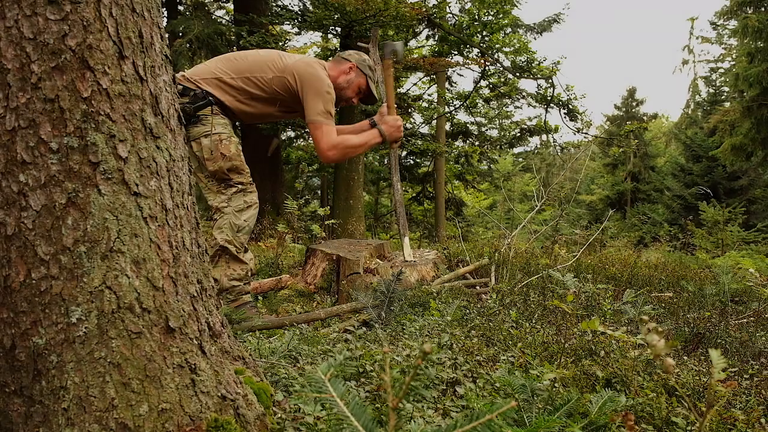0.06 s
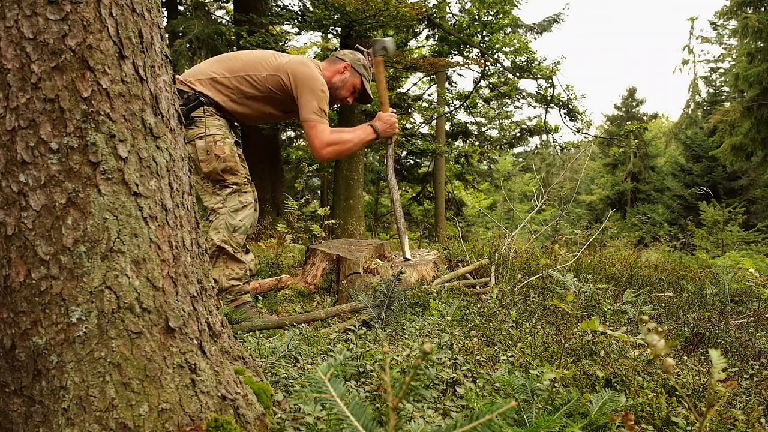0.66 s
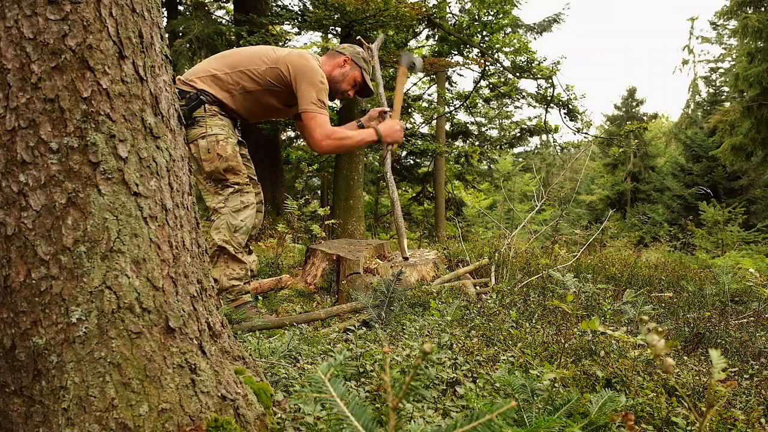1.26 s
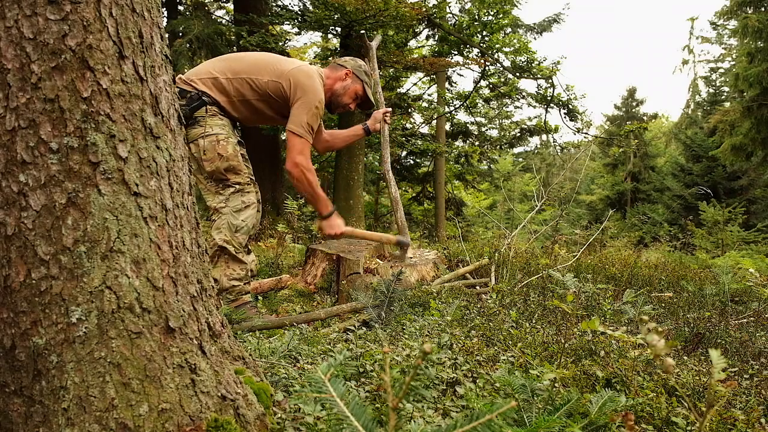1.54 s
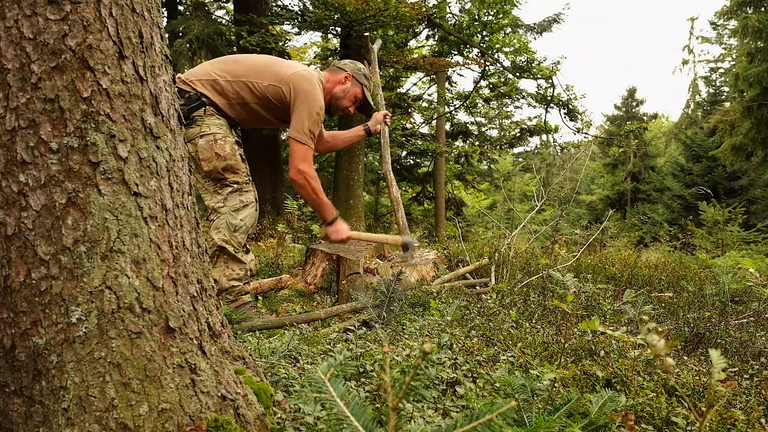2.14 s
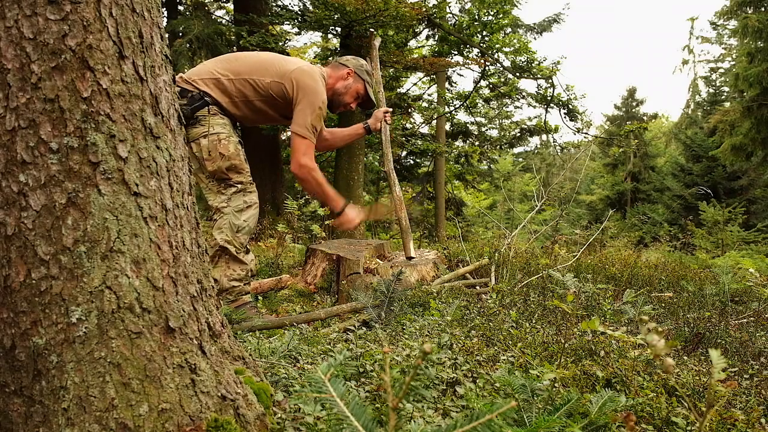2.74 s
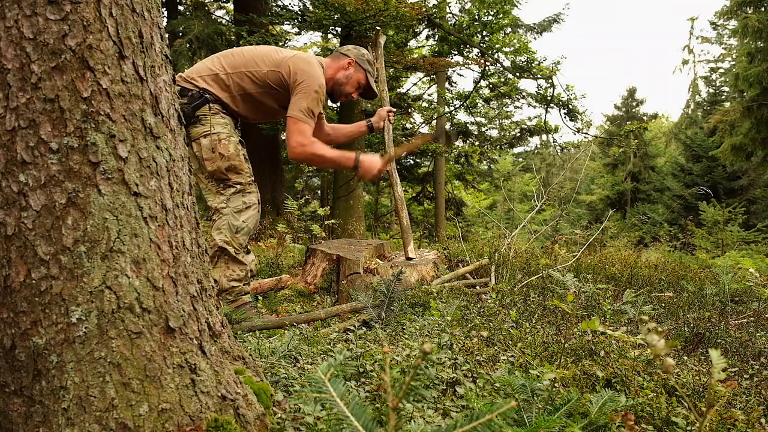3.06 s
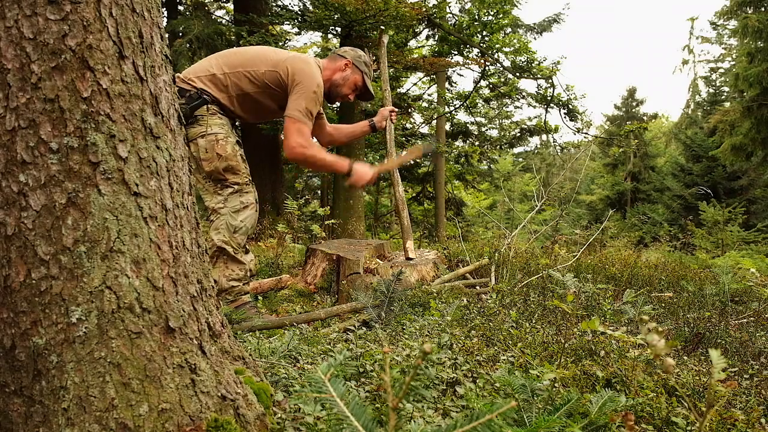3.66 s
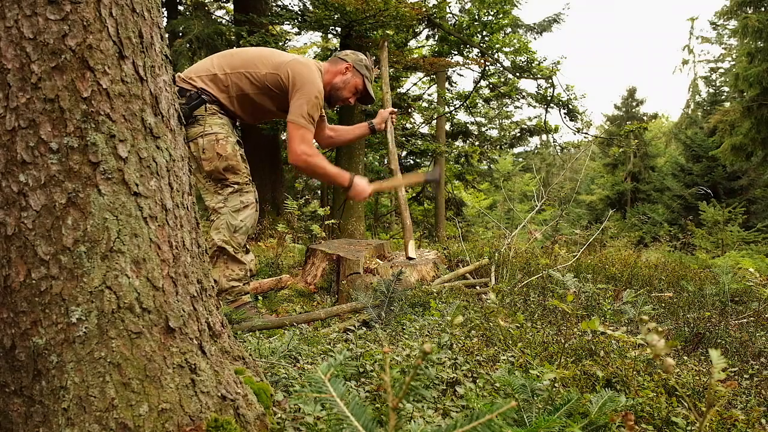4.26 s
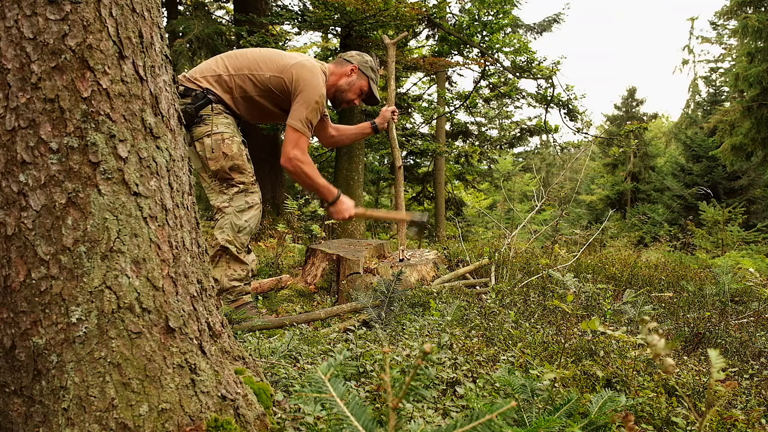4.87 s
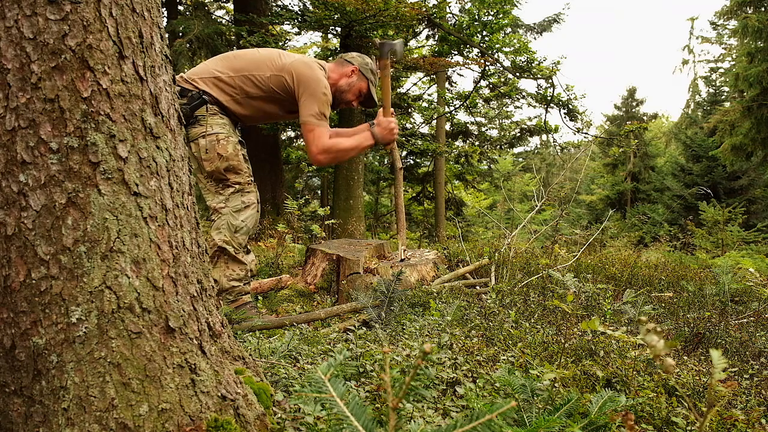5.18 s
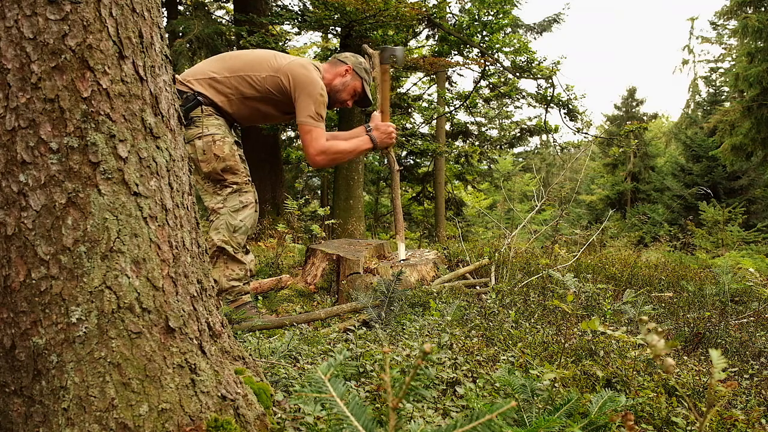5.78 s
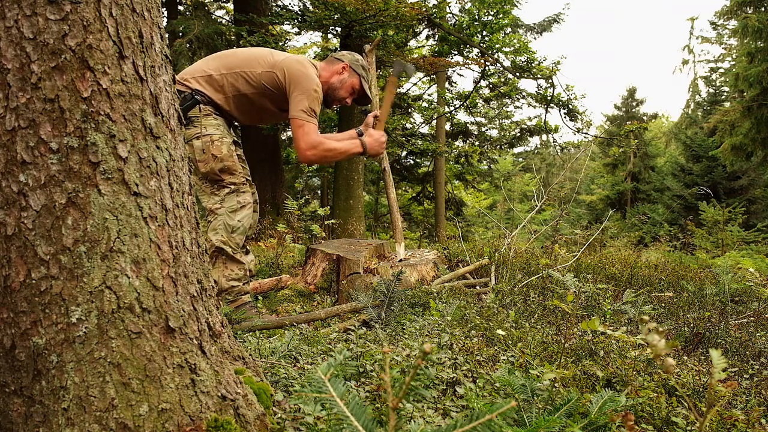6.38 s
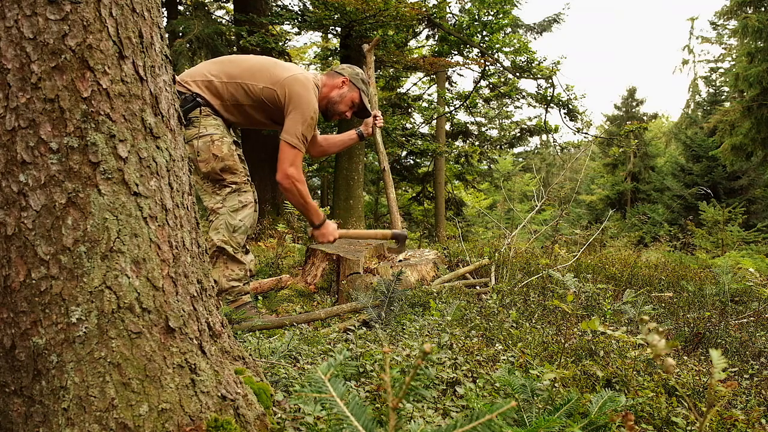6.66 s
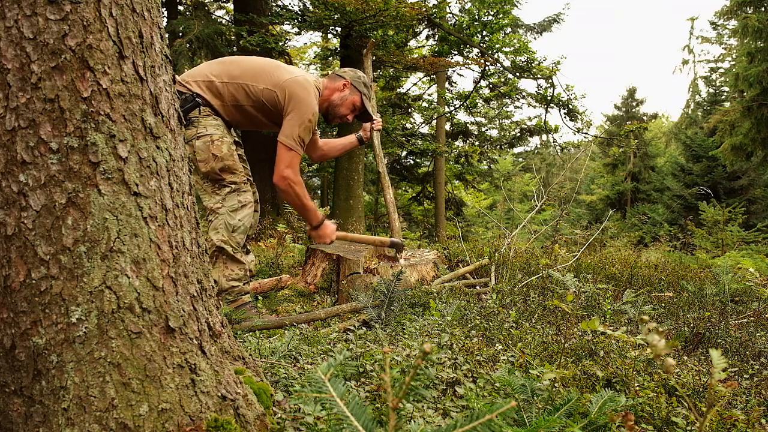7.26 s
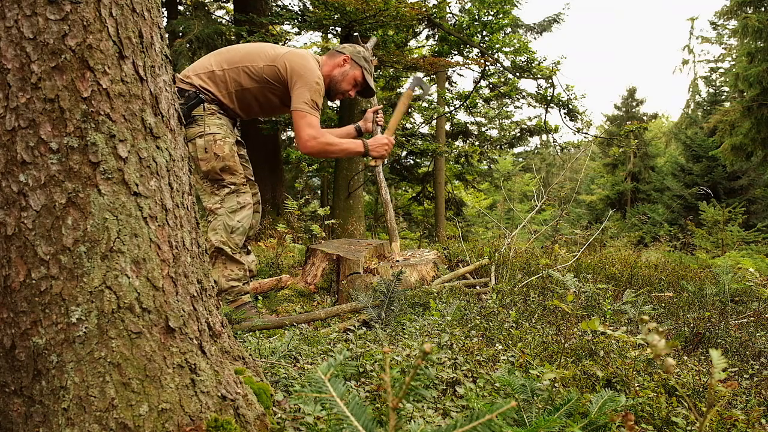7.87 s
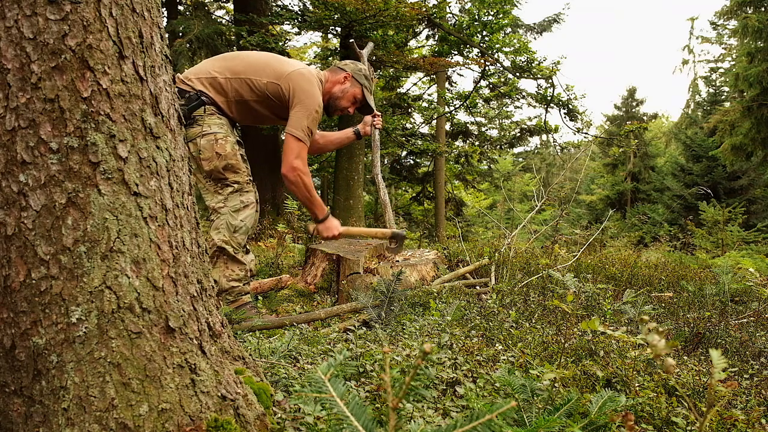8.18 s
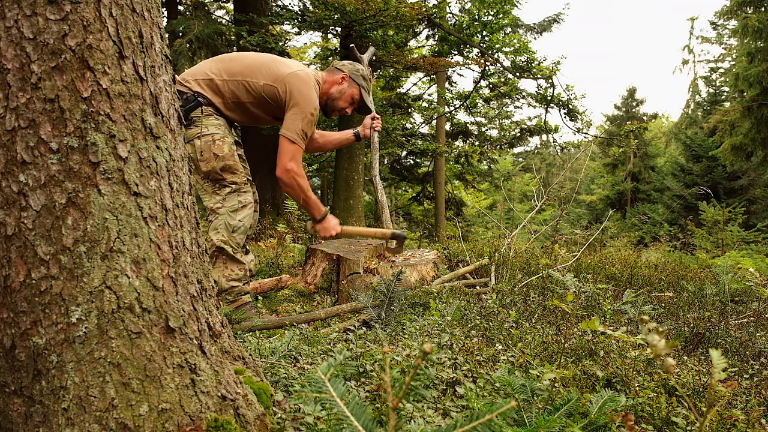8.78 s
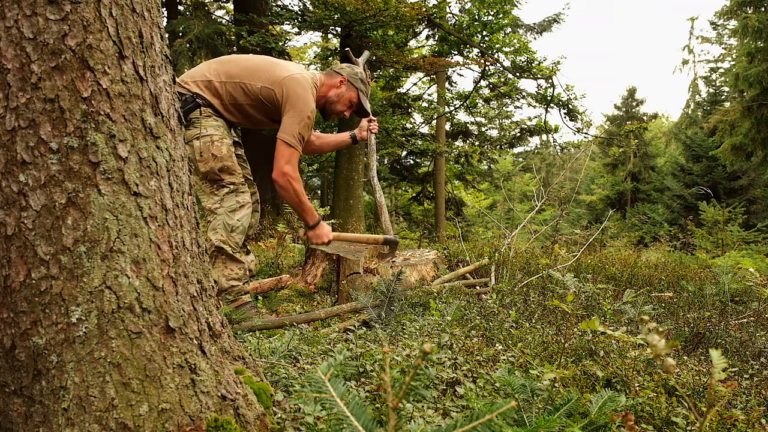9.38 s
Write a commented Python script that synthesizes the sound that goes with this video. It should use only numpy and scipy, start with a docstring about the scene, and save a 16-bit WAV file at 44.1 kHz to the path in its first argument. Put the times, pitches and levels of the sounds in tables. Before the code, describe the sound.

A hatchet chops a stick on a stump close to the microphone, fifteen steady strokes with a sharp, splintery crack. Some carry a quick second knock, and the loudest overload slightly. Chips patter down, and the stick and sleeves tick and rustle between strokes. The surrounding forest returns a soft, late echo over faint wind and a far drone.

```python
"""Hatchet in a forest clearing

Close to the microphone a hatchet points a stick on a stump: fifteen steady chops, some with a second
knock as the blade runs on. The harder the chop, the shorter its bite and the higher the wood sounds.
Loud chops overload the microphone, chips patter down, and the trees send back a soft, late echo.
Between strokes the stick and sleeves tick and rustle over faint wind and a far drone."""
import sys
import numpy as np
from scipy.fft import rfft, irfft, next_fast_len
from scipy.io import wavfile
from scipy.ndimage import map_coordinates

SR = 44100
rng = np.random.default_rng(int(sys.argv[2]) if len(sys.argv) > 2 else 0)


def output_pcm(signal):
    """Save a mono or channel-first signal as 16-bit PCM at the path in sys.argv[1].

    Samples are clipped to [-1, 1] before scaling.
    """
    pcm = np.clip(np.atleast_2d(signal).T, -1, 1) * 32767
    wavfile.write(sys.argv[1], SR, np.round(pcm).astype(np.int16))


N = 420713

# The hatchet strokes, with levels relative within each column: start_s, wood_db, snap_db, snap_hz,
# splinter_db, stump_db, ground_db, ring_hz, echo_db, echo_hz
CHOPS = [(.2978, -11, -5.5, 2900, -16, -29, -51, 2700, -54.5, 2880),
         (.9337, -12.5, -22.5, 2380, -15, -35, -45, 2600, -58, 1870),
         (1.6178, -15, -14.5, 3240, -15, -22.5, -42, 4980, -64, 2820),
         (2.2148, -7.5, -19, 2790, -15, -24, -45.5, 2400, -59, 1650),
         (2.8459, -13, -8, 4930, -13.5, -22, -50, 4990, -65, 1610),
         (3.4890, -7.5, -11, 4010, -11, -26, -62, 2240, -62, 1996),
         (4.1177, -8, -5, 3710, -16.5, -24, -51, 2230, -55.5, 2500),
         (4.7717, -16.5, -13, 3500, -21.5, -23.5, -37.5, 2214, -66, 2310),
         (5.4254, -15, -13.5, 3740, -15, -25, -39.5, 4200, -62.5, 1350),
         (6.0600, -16, -18.5, 3705, -20.5, -19, -38.5, 5550, -64.5, 1307),
         (6.7005, -20, -18, 3650, -25, -16, -44, 5400, -63, 1150),
         (7.3307, -18.5, -12, 2656, -13, -30, -53, 5430, -70, 2705),
         (8.2063, -16, -10.5, 3846, -33, -28, -39, 5400, -64.5, 3900),
         (8.7996, -17, -24, 3480, -53, -25, -40, 2200, -61, 1630),
         (9.4152, -12.5, -17, 3380, -34, -19, -46, 5470, -58, 1600)]
# Resonances of the stump: pitch_hz, width_hz, level_db
STUMP = [(118, 110, -11), (270, 110, 1.5), (477, 140, 0.5), (777.6, 260, -9)]
# Spectrum of splintering wood: frequency_hz, level_db
SPLINTER = [(100, -23.5), (1000, -1.5), (4000, -1), (8000, -1), (13000, -7.5), (17000, -11.5)]
# Treble hiss of the leaves over time: time_s, level_db
LEAF_HISS = [(0.0, -70), (1.89, -73.5), (2.36, -77.5), (2.92, -71), (3.27, -77), (4.59, -69.5), (4.86, -76),
             (5.95, -77.5), (6.19, -71), (6.38, -75), (9.22, -76.5), (9.54, -72)]
USUAL_WOOD_DB, USUAL_GROUND_DB = -13.5, -46  # wood_db and ground_db of an ordinary chop


def amp(db):
    return 10 ** (np.asarray(db) / 20)


def unit(x):
    return x / np.sqrt(np.mean(x ** 2) + 1e-20)


def seconds(length):
    return np.arange(int(length * SR)) / SR


def add(track, start_s, x):
    """Mix x into the track at start_s."""
    i = max(round(start_s * SR), 0)
    track[i:i + len(x)] += x[:max(N - i, 0)]


def curve(points):
    """One value per sample through (time_s, value) points."""
    return np.interp(np.arange(N) / SR, *np.transpose(points))


def step(at_s, spread_s):
    """A smooth rise from 0 to 1 around a moment, one value per sample."""
    return .5 + .5 * np.tanh((np.arange(N) / SR - at_s) / spread_s)


def wobble(rate, size):
    """A smooth random curve, rate knots a second."""
    knots = rng.standard_normal(int(size * rate / SR) + 4)
    return map_coordinates(knots, [np.arange(size) * rate / SR])


def filtered(x, response):
    """x through a complex response of frequency."""
    m = next_fast_len(len(x) + 4096)
    return irfft(rfft(x, m) * response(np.fft.rfftfreq(m, 1 / SR)), m)[:len(x)]


def colour(points):
    """Response through (frequency_hz, level_db) points on a log axis."""
    hz, db = np.transpose(points)
    return lambda f: amp(np.interp(np.log(f + 1), np.log(hz), db))


def modes(rows):
    """Causal response of (pitch_hz, width_hz, level_db) resonances, alternating in sign."""
    return lambda f: sum((-1) ** k * amp(db) * 1j * f * width / (hz * hz - f * f + 1j * f * width)
                         for k, (hz, width, db) in enumerate(rows))


def noise(response, size):
    """Coloured noise of rms 1."""
    return unit(filtered(rng.standard_normal(size), response))


def burst(response, bite_s, t60_s, grain_db=2):
    """Fibres break in uneven snaps for the bite, then die away; they shake a resonant body."""
    t = seconds(.08)
    force = amp(-60 * np.maximum(t - bite_s, 0) / t60_s)
    snaps = rng.standard_normal(len(t)) * amp(grain_db * wobble(2500, len(t)))
    body = filtered(snaps * force, response)
    return body * np.sqrt(np.sum(force ** 2) / np.sum(body ** 2))


def wind():
    """Air moves through the clearing: a gently swinging rumble, a soft rush and the hiss of leaves."""
    # Spectrum of the forest air: frequency_hz, level_db
    air_spectrum = [(12, -48.5), (20, -18.5), (26, -21.5), (48, -3), (120, -6), (154, -13), (660, -16.5),
                    (780, -17.5), (949, -16.5), (1400, -33), (1660, -24), (1810, -33.5), (3340, -29),
                    (5230, -33), (16000, -40)]
    air = colour(air_spectrum)
    gusts_db = .5 * wobble(1.5, N) + 1.4 * wobble(9.5, N)
    rumble = amp(-64.8 + gusts_db) * noise(lambda f: air(f) / (1 + (f / 300) ** 4), N)
    rush_db = -71.5 + .2 * wobble(4.3, N)
    rush = amp(rush_db) * noise(lambda f: air(f) * (f > 280) / (1 + (f / 4500) ** 2), N)
    hiss = amp(curve(LEAF_HISS)) * noise(lambda f: air(f) * f ** 2 / (f ** 2 + 3500 ** 2), N)
    return rumble + rush + hiss


def far_drone():
    """Far off, a wavering drone climbs and swells as it speeds up, beside a faint steady whir."""
    # Narrow bands of the distant whir: pitch_hz, width_hz, level_db
    whir_bands = [(1010, 270, -72.5), (1701, 45, -79)]
    pitch_hz = (109 + 15 * step(at_s=6.65, spread_s=.59)) * (1 + .017 * wobble(17, N))
    level_db = -75.5 + 13 * step(at_s=6.5, spread_s=1.2) + 3 * wobble(8, N)
    drone = amp(level_db) * np.sin(2 * np.pi * np.cumsum(pitch_hz) / SR)
    whir = sum(amp(db) * noise(modes([(hz, width, 0)]), N) for hz, width, db in whir_bands)
    return drone + whir


def forest_echo():
    """Undergrowth scatters each chop at once, near trunks answer next, far trees late and tinted by it."""
    # Spectrum of the scatter from nearby undergrowth: frequency_hz, level_db
    undergrowth = [(40, 0), (90, 3), (250, 0), (600, -1.5), (1500, 0), (4500, -9), (7000, -21.5),
                   (16000, -32)]
    # Spectrum of the echo from the trees: frequency_hz, level_db
    tree_spectrum = [(100, -20.5), (600, -19), (1100, 1.5), (2800, -3), (5000, -11), (8000, -21),
                     (16000, -33)]
    trees = colour(tree_spectrum)
    rise_s, hold_s, t60_s = .03, .13, 1.7  # the far echo
    out, early, t = np.zeros(N), seconds(.16), seconds(1.1)
    scatter_shape = amp(-60 * early / .13) * (1 - np.exp(-early / .0045))
    slap_shape = np.exp(-((early - .05) / .013) ** 2)
    echo_shape = np.clip(t / rise_s, 0, 1) * amp(-60 * np.maximum(t - hold_s, 0) / t60_s)
    for start_s, *_, ground_db, _, echo_db, echo_hz in CHOPS:
        scatter_db = -39 + .67 * (ground_db - USUAL_GROUND_DB)  # grows with the thud
        add(out, start_s, amp(scatter_db) * scatter_shape * noise(colour(undergrowth), len(early)))
        add(out, start_s, amp(-52.5) * slap_shape * noise(lambda f: trees(f) * f ** .4, len(early)))
        tint = modes([(echo_hz, echo_hz * .4, 0), (echo_hz, 130, -14)])
        trunks = amp(1.8 * wobble(70, len(t)))  # single trunks stand out of the echo
        echo = noise(lambda f: trees(f) * (.57 + 2 * abs(tint(f))), len(t))
        add(out, start_s, amp(echo_db + 2) * echo_shape * trunks * echo)
    return out


def crumb():
    """A tiny dry snap with a pitch of its own."""
    hz = 5000 * np.exp(.5 * rng.normal())
    peak = modes([(hz, hz * .5, 0)])
    return burst(lambda f: colour(SPLINTER)(f) * (.3 + abs(peak(f))), bite_s=.00045, t60_s=.011)


def crackle():
    """Tiny creaks of needles, bark and cloth, stronger while the leaves hiss."""
    out, hiss_db = np.zeros(N), curve(LEAF_HISS)
    for when, size in rng.random(size=(170, 2)):
        level_db = hiss_db[int(when * N)] + 3 + 13 * size ** 2
        add(out, when * N / SR, amp(level_db) * crumb())
    return out


def rustles():
    """Sleeves brush and the blade grazes bark in grainy swells of friction."""
    # Brushing movements: start_s, length_s, level_db
    brushes = [(0.098, 0.087, -54.5), (0.286, 0.0091, -48.5), (1.75, .16, -66), (3.735, 0.055, -52.5),
               (3.794, 0.25, -68), (4.229, 0.32, -67), (4.557, 0.042, -54.5), (4.753, 0.022, -45),
               (6.133, 0.23, -58.5), (6.82, 0.27, -62), (8.24, .22, -62), (9.47, .07, -61)]
    # Spectrum of rubbing cloth: frequency_hz, level_db
    cloth = [(100, -18.5), (700, 1), (1800, 2.5), (5000, -1), (10000, -4), (16000, -16)]
    out = np.zeros(N)
    for start_s, length_s, level_db in brushes:
        t = seconds(length_s)
        swell = np.sin(np.pi * (t / length_s) ** .439)
        grain = amp(4.5 * wobble(350, len(t)))
        add(out, start_s, amp(level_db) * swell * unit(grain * noise(colour(cloth), len(t))))
    return out


def tick(hz):
    """A small piece of wood is tapped: two broad resonances and a splintery edge."""
    body = burst(modes([(hz, hz * .46, 0), (hz * 2.1, hz * .43, -5)]), bite_s=.00074, t60_s=.021)
    edge = burst(colour(SPLINTER), bite_s=.001, t60_s=.0067)
    return amp(-11.5) * body + amp(-11) * edge


def litter():
    """Chips and twigs tick; the stick shifts before each chop, and crumbs rain down after it."""
    # The clearest chips landing and twigs ticking: start_s, peak_db, pitch_hz
    clear_ticks = [(0.097, -36.5, 1520), (0.348, -34, 1100), (0.794, -39.5, 2770), (0.872, -34, 1900),
                   (1.12, -21.5, 2500), (1.335, -38, 2280), (2.438, -40, 1520), (2.609, -41, 1570),
                   (2.725, -39, 2330), (2.778, -35.5, 1880), (2.96, -38, 2210), (3.275, -35.5, 1700),
                   (4.063, -37.5, 3920), (4.627, -33, 2320), (5.052, -43, 1400), (5.501, -26.5, 1290),
                   (5.626, -38, 1570), (6.16, -36, 1210), (6.299, -34.5, 1410), (6.837, -34, 1600),
                   (6.956, -44, 1030), (7.02, -41.5, 1070)]
    out = np.zeros(N)
    for start_s, peak_db, pitch_hz in clear_ticks:
        add(out, start_s, amp(peak_db) * tick(pitch_hz))
    for chop_s, *_ in CHOPS:
        for lead_s in rng.uniform(.04, .42, size=3):
            shift_db = rng.normal(-48.5, 2.2)
            shift_hz = 2190 * np.exp(.34 * rng.normal())
            add(out, chop_s - lead_s, amp(shift_db) * tick(shift_hz))
        for fall_s, crumb_db in zip(rng.uniform(.017, .69, size=6), rng.normal(-57.5, 3.2, size=6)):
            add(out, chop_s + fall_s, amp(crumb_db) * crumb())
    return out


def chip_ping():
    """One dry chip rings as it lands."""
    # Modes of the chip: pitch_hz, level_db, t60_s
    chip_modes = [(1276, -39.5, 0.11), (1700, -33.5, 0.044)]
    out, t = np.zeros(N), seconds(1)
    ping = sum(amp(db - 60 * t / t60) * np.sin(2 * np.pi * hz * t) for hz, db, t60 in chip_modes)
    add(out, 5.5005, ping)
    return out


def head_ring():
    """The steel head sings faintly after a chop; the point of contact favours modes near ring_hz."""
    # Modes of the steel head: pitch_hz, width_hz, level_db
    head_modes = [(2250, 150, 3), (2680, 170, 0), (3890, 200, -3), (5020, 380, -2), (5500, 330, -2)]
    db_per_octave, max_loss_db = 30, 8  # weakening away from ring_hz
    out, t, lowest_hz = np.zeros(N), seconds(1), head_modes[0][0]
    for start_s, wood_db, *_, ring_hz, _, _ in CHOPS:
        struck = [(hz, width, db - min(db_per_octave * abs(np.log2(hz / ring_hz)), max_loss_db))
                  for hz, width, db in head_modes]
        t60_s = 1.8 * lowest_hz / ring_hz  # a higher ring dies sooner
        level_db = -62.5 + .45 * (wood_db - USUAL_WOOD_DB)
        tone = noise(lambda f: modes(struck)(f) ** 2, len(t))  # squared: dark between the modes
        add(out, start_s, amp(level_db - 60 * t / t60_s) * tone)
    return out


def knocks():
    """The blade runs on, or the stick jumps on the stump: shorter, blunter contacts of the same wood."""
    # Contacts just after a chop: start_s, wood_db, wood_hz, stump_db
    contacts = [(0.943, -24, 1344, -41), (0.947, -18, 1132, -37.5), (0.9621, -28.5, 1596, -38),
                (1.6260, -22, 2616, -17), (2.2222, -14.5, 1550, -22.5), (4.125, -18, 1688, -30),
                (5.4440, -19, 1336, -26), (6.0688, -23.5, 905, -26), (6.705, -14.5, 765, -15),
                (7.3470, -34, 703, -25.5), (8.2185, -26, 1409, -21), (8.8063, -17, 1500, -26.5),
                (8.8107, -22, 1670, -22), (9.4213, -15, 1270, -27.5)]
    out = np.zeros(N)
    for start_s, wood_db, wood_hz, stump_db in contacts:
        stick = modes([(wood_hz, wood_hz * .3, 0), (3700, 1100, -16)])
        add(out, start_s, amp(wood_db) * burst(stick, bite_s=.001, t60_s=.024))
        add(out, start_s, amp(stump_db) * burst(modes(STUMP), bite_s=.00079, t60_s=.012))
    return out


def push(hz):
    """The edge's first contact: a short swing of pressure."""
    cycles = seconds(.01) * hz
    return -np.sin(2 * np.pi * cycles) * np.exp(-((cycles - .6) / .97) ** 2)


def chops():
    """The edge meets the stick, tears through its fibres and jolts the stump, then the ground under it."""
    out, t = np.zeros(N), seconds(.15)
    thud_shape = np.exp(-((t - .03) / .023) ** 2)  # the soil's deep thud peaks after the crack
    for start_s, wood_db, snap_db, snap_hz, splinter_db, stump_db, ground_db, *_ in CHOPS:
        force_db = wood_db - USUAL_WOOD_DB  # extra force: shorter bite, higher stick and stump
        bite_s = .0048 * np.exp(-.05 * force_db)
        wood_hz = 1435 * np.exp(.016 * force_db)
        stump_ratio = .97 * np.exp(.026 * force_db)
        stick = burst(modes([(wood_hz, wood_hz * .33, 0)]), bite_s * .85, t60_s=.016)
        stump = burst(lambda f: modes(STUMP)(f / stump_ratio), bite_s * .7, t60_s=.023)
        snap = burst(modes([(snap_hz, snap_hz * .22, 0)]), bite_s * .8, t60_s=.0084, grain_db=3.5)
        splinters = burst(colour(SPLINTER), bite_s * .52, t60_s=.0065, grain_db=4)
        thud_hz = 77 * (1 + .12 * rng.normal())
        tear_s = start_s + .0009  # the wood gives way just after contact
        add(out, start_s, amp(wood_db + 5.5) * push(wood_hz * .88))
        add(out, start_s + .0005, amp(wood_db - 1.5) * stick)
        add(out, start_s, amp(stump_db) * stump)
        add(out, tear_s, amp(snap_db - 1.5) * snap + amp(splinter_db + 2.5) * splinters)
        add(out, start_s, amp(ground_db) * thud_shape * np.sin(2 * np.pi * thud_hz * t))
    return out


def scene():
    """The hatchet and its small noises up close, the forest behind, all at one microphone."""
    hatchet = chops() + knocks() + head_ring()
    small_noises = chip_ping() + litter() + crackle() + rustles()
    distance = forest_echo() + wind() + far_drone()
    return (hatchet + small_noises + distance)[None]


def record(dry):
    """The microphone input clips; overload turns the gain down briefly; deep bass and top are cut."""
    ceiling, overload, low_hz, top_hz = .385, .28, 30, 16100
    attack_s, release_s = .0047, .2
    x, now = dry[0], np.arange(N) / SR
    clipped = x / (1 + np.abs(x / ceiling) ** 5) ** (1 / 5)
    last_overload_s = np.maximum.accumulate(np.where(np.abs(x) > overload, now, -1))
    since_s = now - last_overload_s
    duck_db = -5.5 * (1 - np.exp(-since_s / attack_s)) * np.exp(-(since_s / release_s) ** 2)
    passband = lambda f: 1j * f / (low_hz + 1j * f) / (1 + (f / top_hz) ** 90)
    return filtered(clipped * amp(duck_db), passband)[None]


dry = scene()
out = record(dry)
output_pcm(out)
```